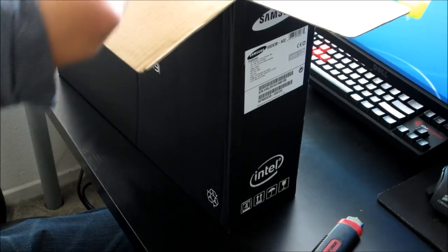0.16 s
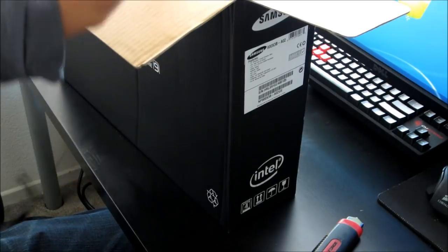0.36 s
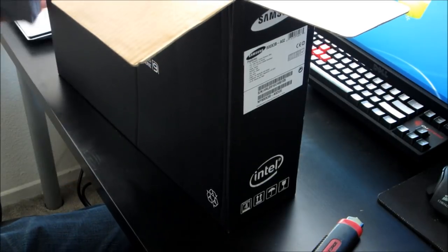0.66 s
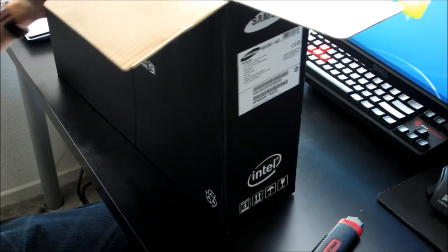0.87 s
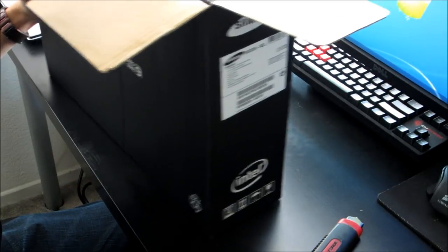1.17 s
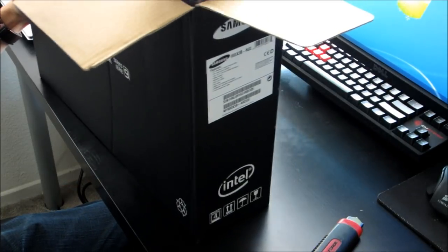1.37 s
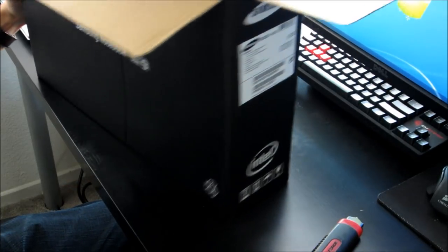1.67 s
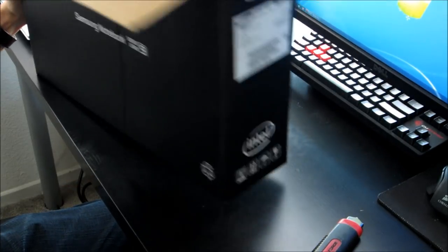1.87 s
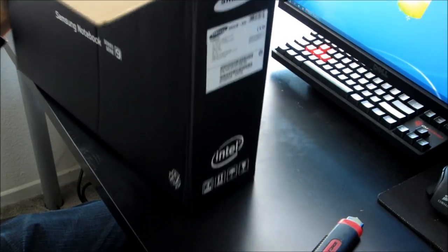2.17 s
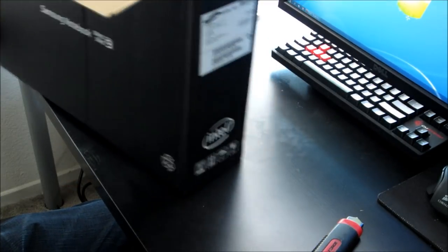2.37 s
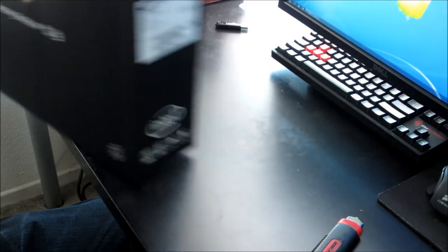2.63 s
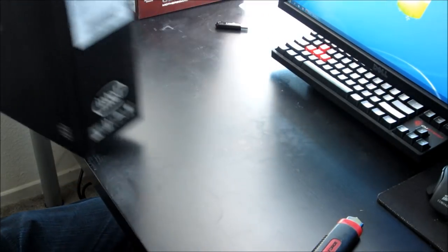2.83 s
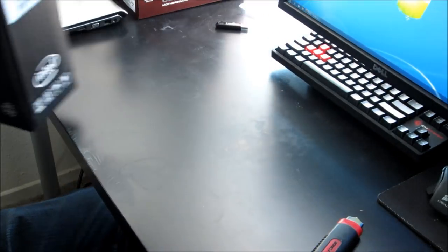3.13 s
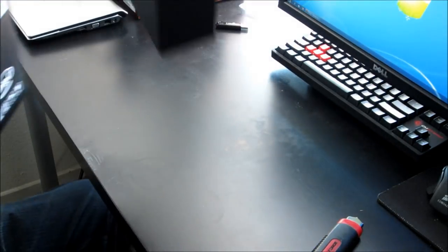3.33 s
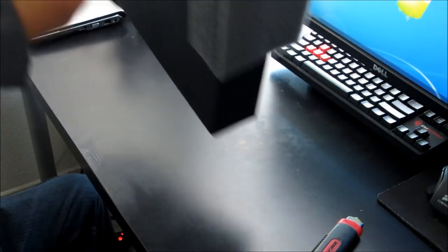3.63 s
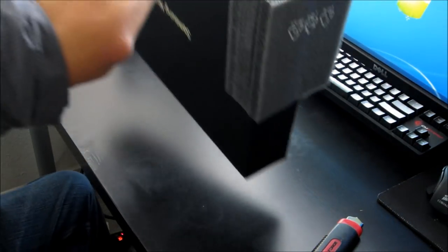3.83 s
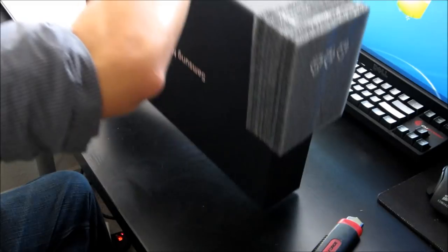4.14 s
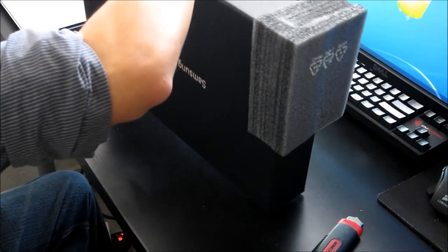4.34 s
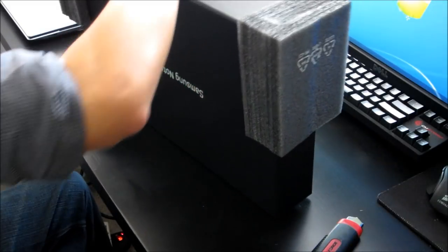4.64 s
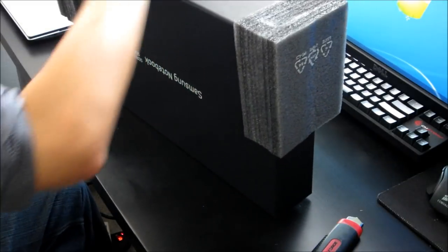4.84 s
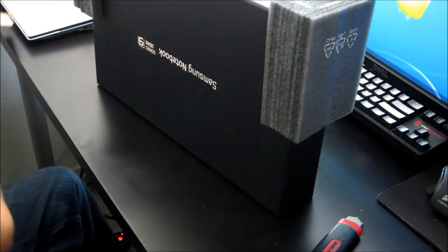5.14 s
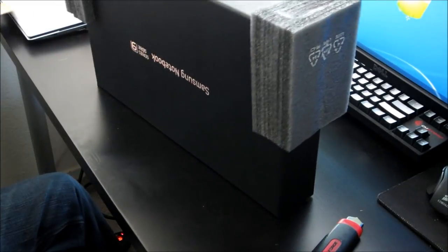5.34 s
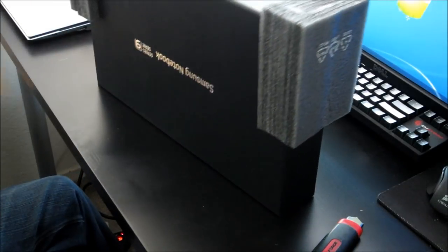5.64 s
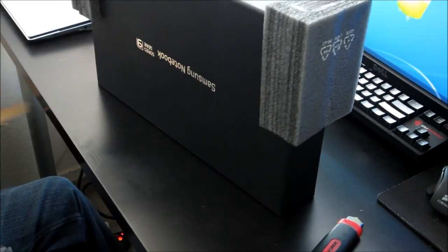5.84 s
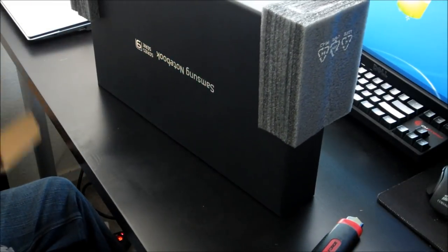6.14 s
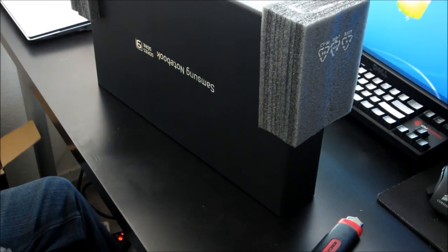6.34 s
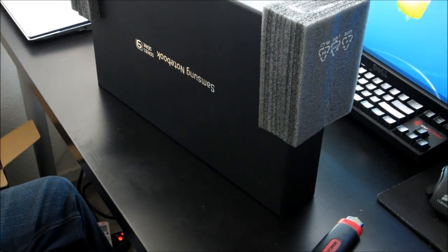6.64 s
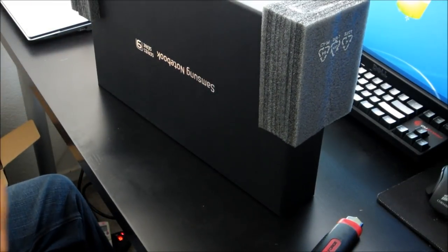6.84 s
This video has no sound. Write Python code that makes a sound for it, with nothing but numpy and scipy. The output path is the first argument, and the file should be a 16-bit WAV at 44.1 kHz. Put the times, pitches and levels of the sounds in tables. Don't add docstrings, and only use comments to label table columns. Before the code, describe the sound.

Hands fumble with a hollow cardboard box, its contents scrape out to a loud knock, then it is set down with thuds and flap rustles.

```python
import sys
import numpy as np
from scipy import signal
from scipy.fft import rfft, irfft, next_fast_len
from scipy.io import wavfile
from scipy.ndimage import uniform_filter1d

SR = 44100
rng = np.random.default_rng(int(sys.argv[2]) if len(sys.argv) > 2 else 0)


def volts_from_decibels(level):
    exponent = np.asarray(level, float) / 20
    return 10 ** exponent


def wav_record(signal):
    frames = np.transpose(np.atleast_2d(signal))
    bounded = np.clip(frames, -1, 1)
    quanta = np.round(bounded * 32767).astype(np.int16)
    wavfile.write(sys.argv[1], SR, quanta)


N = 308692

# f/Hz, level/dB, ring time factor/1
PANELS = [(100, -5, 1.37), (147, -0.5, 1.06), (188, -2, 0.61), (216.3, -1, 1.28), (265.4, -1, 0.73),
          (330, 4, 0.61), (386.6, -4, 1.33), (436.4, 1.5, 0.4), (522, 2.5, 0.52), (603.3, -21, 2),
          (630, -9, 1), (785, -11.5, 0.81), (797, -4.5, 0.61), (900, -2, 0.55), (1060, 0, 0.58),
          (1150, 10.5, 0.26), (1466, -9.5, 0.54), (1900, -13, 0.43), (2500, -40, 0.76)]
BUMP_OCTAVES, BLOW_OCTAVES = 0.64, 0.94

# start t/s, length/s, scrape level/dB, skin hiss level/dB above the scrape
STROKES = [(-.08, 0.18, -42.5, -10.5), (0.045, 0.065, -50, 0), (0.234, 0.13, -40.5, -16.5),
           (0.418, .15, -49, -7.5), (0.523, 0.25, -61, -9.5), (0.778, 0.24, -54, -3.5),
           (0.933, 0.41, -50.5, -10), (2.127, 0.11, -42, -20), (2.21, 0.35, -49, -9.5),
           (2.572, 0.19, -54.5, -6), (2.81, .17, -61.5, -23.5), (3.108, 0.099, -60.5, -23),
           (3.275, 0.14, -57, -24), (3.497, 0.071, -59.5, -18), (3.595, 0.13, -59.5, -11.5),
           (3.756, 0.13, -70, -11.5), (4.264, 0.91, -57.5, -14), (4.599, 0.26, -54, -7.5),
           (4.8, 0.73, -58.5, -10), (5.1, 0.25, -53, -18), (5.26, 0.23, -53, -8), (5.493, 0.35, -42, -19.5),
           (5.75, 0.24, -53, -11.5), (5.94, 0.16, -43, -12), (6.05, 0.22, -52, -2.5),
           (6.192, 0.21, -47.5, 0), (5.659, 0.11, -52, 0), (5.515, .035, -54, 2), (5.417, 0.089, -55.5, -8),
           (6.267, 0.13, -32.5, -31), (6.416, 0.19, -46.5, -18.5), (6.557, 0.14, -56.5, -15)]
# start t/s, length/s, level/dB
GRIPS = [(-.07, 0.086, -48), (.13, .1, -61), (.22, .16, -41), (.44, 0.073, -42.5), (.745, 0.18, -38.5),
         (.95, 0.21, -41.5), (1.12, 0.51, -46), (1.44, 0.52, -40.5), (1.83, 0.27, -40.5), (2.12, 0.2, -40),
         (2.32, 0.11, -45), (2.5, 0.39, -52), (2.63, 0.15, -45.5), (3.09, 0.25, -55.5), (3.255, 0.19, -47),
         (3.46, 0.094, -49), (3.57, 0.33, -48.5), (4.19, 0.46, -55.5), (4.55, 0.43, -52.5),
         (4.81, 0.61, -50), (5.105, 0.1, -40.5), (5.24, 0.17, -48.5), (5.44, .11, -39), (5.54, 0.15, -34),
         (5.65, .15, -40), (5.89, 0.29, -39.5), (6.2, 0.24, -35.5), (6.43, 0.22, -60)]
# t/s, drag level/dB, fibre hiss level/dB above the drag, rubbed flap f/Hz
SLIDE = [(1.139, -47, -11.5, 1060), (1.197, -32, -6, 1800), (1.25, -36, -8, 1800), (1.426, -33, -3.5, 2050),
         (1.55, -32.5, -3.5, 1800), (1.676, -31.5, -3.5, 1900), (1.75, -28.5, -5.5, 2000),
         (1.85, -31, -6.5, 1900), (1.9, -31.5, -10, 1850), (1.986, -32.5, -9.5, 1700),
         (2.06, -31, -5.5, 1550), (2.1, -35, -7.5, 1690), (2.12, -44, -6, 1700)]
# f/Hz, level/dB
SCRAPE_TONE = [(210, -33.5), (350, -8.5), (409, 7.5), (478, 6), (624, 2), (921, 6.5), (1180, 1.5),
               (1800, 2.5), (3620, -7.5), (5000, -27), (6500, -20), (11000, -120)]
# f/Hz, level/dB
FIBRE_TONE = [(900, -20), (1470, -7.5), (2300, -3.5), (2900, -4.5), (3630, -7.5), (5520, -10), (7470, -15),
              (9960, -25.5), (11100, -35), (11900, -40), (12700, -34), (13900, -32), (15200, -33),
              (16000, -34)]
# f/Hz, level/dB
SKIN_TONE = [(1470, -9), (2500, 0), (3980, -9), (4510, -6.5), (8800, -14.5), (11100, -27), (11900, -30.5),
             (14100, -20.5), (16000, -21.5)]
EARLY, POINTED = 0.74, 1
REST_CREAK_DB, REST_SCRAPE_DB, REST_HISS_DB = -77.5, -71.5, -71.5
CRACKLE_DB = -6
FLAP_HZ, FLAP_HZ_PER_DB = 1000, 1.5
FLAP_WANDER = 0.1
LOWER_FLAP, LOWER_FLAP_GAIN = 0.69, 2.8

# t/s, peak level/dB, struck panel f/Hz, ring t60/s, paper level/dB above the peak
SLAPS = [(0.079, -30, 730, 0.083, -2), (0.17, -26.5, 635, 0.067, -3), (0.226, -28, 334, 0.23, -5),
         (0.585, -39.5, 630, 0.06, -17), (0.801, -27.5, 271, 0.1, -11), (2.597, -22, 405, 0.11, -13),
         (2.723, -47.5, 312, 0.16, -4), (3.639, -40.5, 253, 0.11, -14), (4.242, -15, 324, 0.12, -18.5),
         (5.429, -27, 1010, 0.15, -8.5), (5.7, -25.5, 900, 0.046, -10.5), (5.946, -12.5, 242, 0.22, -24),
         (6.068, -29, 960, 0.069, -12.5), (6.217, -38, 1500, 0.15, -4), (6.264, -16.5, 188, 0.24, -16.5),
         (6.51, -36, 410, 0.12, -8)]
# t/s, peak level/dB, struck panel f/Hz, ring t60/s
KNOCKS = [(0.278, -25.5, 764, 0.31), (0.445, -40.5, 172, 0.2), (0.638, -39.5, 320, 0.05),
          (0.925, -35, 227, 0.48), (2.126, -6.5, 300, 0.1), (3.131, -45.5, 477, 0.19),
          (3.561, -33, 242, 0.14), (3.677, -36, 292, 0.067), (4.2, -44, 535, 0.47),
          (4.594, -8.5, 148, 0.062), (4.601, -6.5, 314, 0.12), (4.669, -20, 150, 0.18),
          (5.107, -25, 282, 0.079), (5.484, -25, 300, 0.18), (5.527, -35, 315, 0.15),
          (5.61, -26, 304, 0.074), (5.829, -30.5, 310, 0.13), (5.9, -33, 342, 0.058),
          (6.291, -10.5, 470, 0.16), (6.309, -10.5, 580, 0.06), (6.334, -14.5, 500, 0.11)]
# t/s, peak level/dB, struck panel f/Hz, ring t60/s
BUMPS = [(0.324, -23.5, 685, 0.12), (0.677, -35.5, 312, 0.055), (0.753, -30, 190, 0.3),
         (2.136, -6, 215, 0.14), (2.172, -16.5, 227, 0.18), (2.382, -29, 234, 0.49), (2.44, -30, 240, 0.14),
         (3.259, -30.5, 293, 0.17), (3.325, -23, 200, 0.2), (3.458, -33, 242, 0.15),
         (3.783, -38, 248, 0.052), (3.868, -42.5, 306, 0.08), (5.019, -39, 400, 0.18),
         (5.339, -35.5, 440, 0.15), (5.578, -20.5, 203, 0.21), (5.874, -29.5, 390, 0.061),
         (6.35, -17.5, 199, 0.16), (6.383, -18.5, 317, 0.13)]
# f/Hz, level/dB
PAPER_TONE = [(410, -17), (700, 0.5), (1090, -4), (1280, -6), (1380, -10), (1640, -11), (3500, -24),
              (3990, -26.5), (6650, -29), (9230, -40.5), (11800, -54), (13100, -51.5), (16000, -43)]
KNOCK_PAPER_DB, BUMP_PAPER_DB = -20.5, -33
SLAP_TOUCH_S, KNOCK_TOUCH_S, BUMP_TOUCH_S = 0.0053, 0.0025, 0.0057

# t/s, peak level/dB, f/Hz
SNAPS = [(0.0808, -17.5, 2370), (0.1676, -26.5, 5600), (0.195, -18, 3430), (0.2259, -39, 3200),
         (0.67, -47, 5800), (0.7986, -62, 3200), (2.128, -21.5, 3770), (2.669, -43, 3280),
         (3.5017, -47, 5900), (3.6477, -45, 3500), (4.505, -48, 5000), (4.596, -31, 3820),
         (5.628, -48, 8000), (5.1093, -60, 3490), (5.4291, -44, 3600), (5.5218, -35.5, 7040),
         (5.7004, -45, 4030)]
# t/s, level/dB, f/Hz, length/s, width/Hz
SQUEAKS = [
    (1.63, -35, 462, 0.068, 47),
    (2.03, -37, 390, 0.055, 80),
    (2.035, -40, 890, 0.055, 150),
    (2.637, -45, 930, 0.03, 90),
    (5.421, -36, 1040, 0.043, 90),
    (5.472, -51.5, 1900, 0.093, 120),
    (6.068, -42, 1000, 0.07, 93),
    (6.214, -41.5, 1760, 0.037, 300),
    (6.462, -47, 1950, .08, 450),
    (0.082, -43, 1980, 0.047, 600),
]
# t/s, level/dB, f/Hz, length/s, width/Hz
MORE_SQUEAKS = [(1, -36, 184, 0.051, 41), (1.62, -39, 226, .08, 70), (2.1, -33, 900, 0.0485, 120),
                (3.27, -36.5, 190, 0.07, 45), (3.34, -48, 264, .06, 50), (3.59, -48, 264, 0.07, 50),
                (5.485, -37.5, 317, 0.054, 73), (5.63, -52, 1820, .05, 150), (5.575, -36.5, 730, 0.05, 140),
                (5.705, -46, 1480, .035, 150), (5.955, -43, 1140, .07, 300), (1.71, -40, 1170, 0.055, 200),
                (.09, -46.5, 1600, .05, 560), (.96, -48, 247, 0.13, 120), (4.63, -33, 322, 0.11, 62)]
# t/s, peak level/dB,
# f/Hz, t60/s
PINGS = [(0.226, -32, 900, 0.041), (0.441, -35, 900, 0.027), (0.278, -28, 1505, 0.045),
         (2.1346, 0, 330, .05), (2.195, -28, 300, 0.11), (2.22, -30, 330, 0.11), (2.149, -32, 2200, 0.034),
         (2.158, -22, 304, 0.063), (3.259, -33.5, 390, 0.13), (3.322, -35.5, 572, 0.081),
         (3.325, -43, 1000, 0.059), (3.458, -43, 520, .07), (3.56, -42, 533, 0.072),
         (3.674, -42, 340, 0.071), (3.784, -39, 240, 0.095), (4.241, -28, 602, 0.046),
         (4.6, -14.5, 325.3, 0.22), (.801, -29, 420, .05), (.2, -32, 250, .08), (.34, -30, 130, .12),
         (4.605, -28, 1020, .09), (4.672, -22, 280, .1), (4.3, -30, 330, .1), (5.13, -34, 340, .1),
         (5.11, -36, 620, .08), (2.365, -36, 240, .1), (2.47, -36, 250, .07), (2.172, -26, 850, .05),
         (5.605, -38, 1500, .03), (5.67, -40, 2100, .03), (5.99, -36, 1500, .04),
         (5.02, -40, 800, .03), (5.326, -44, 1075, .04), (5.438, -32, 1110, .05),
            (5.528, -38.5, 1960, .05), (5.556, -35, 1080, .08), (5.583, -18, 280, 0.055),
            (5.622, -24, 271, .06), (5.639, -25, 260, 0.065), (5.594, -34, 765, .06),
            (5.704, -25, 950, .03), (5.632, -38, 2150, .05), (5.64, -40, 1380, .06),
            (5.701, -34, 1800, 0.046), (5.873, -34, 800, .03), (5.942, -20, 406, 0.075),
            (6.069, -27, 1000, 0.1), (6.217, -37, 1600, 0.044), (6.293, -13, 416, .07),
            (6.305, -20, 1184, 0.095), (6.322, -17, 519, 0.1), (6.345, -19, 485, 0.057),
            (6.428, -37, 1176, .05), (6.242, -28, 200, .08), (6.31, -30, 1900, .05),
            (6.312, -35, 2600, .04), (6.365, -29, 1160, .04), (6.515, -38, 900, .05),
            (6.49, -38, 396, 0.11), (5.969, -23, 287, .06), (3.135, -49, 900, .04), (3.335, -45, 1200, .05),
            (4.93, -44, 350, .07), (5.2, -44, 300, .07), (2.599, -23, 415, .07), (4.246, -20, 300, .09),
            (0.085, -35, 2200, .05)]
PING_RISE_CYCLES = 0.95
# t/s, peak level/dB, f/Hz, t60/s
THUMPS = [(0.329, -31.5, 94, 0.14), (2.13, -38, 90, 0.63), (2.601, -36.5, 75, 0.2), (3.299, -59, 92, 0.41),
          (4.251, -38.5, 52.6, 0.35), (4.297, -45, 44.5, 0.2), (4.602, -19, 72.3, 0.25),
          (4.629, -44, 80.2, 0.8), (5.55, -35, 105.3, 0.38), (4.589, -14, 139, 0.24),
          (6.268, -12.5, 86.4, 0.076)]

# f/Hz, level/dB
AIR_TONE = [(12, -46), (20, -1.5), (216, 2), (301, 0), (446, -4.5), (558, -2.5), (738, -7.5), (1090, -9),
            (2390, -18.5), (3740, -28), (7730, -29), (10500, -43.5), (11800, -49.5), (13900, -46),
            (16000, -36.5)]
AIR_DB = -49.5
# f/Hz, t60/s
ROOM = [(100, 0.27), (400, 0.27), (1500, 0.2), (6000, 0.19)]
ROOM_DB = -8
# f/Hz, left minus right level/dB
LEAN_RUB = [(60, -2), (180, -16), (550, -2.5), (1650, 0), (4970, 4.5), (15000, 8)]
# f/Hz, left minus right level/dB
LEAN_KNOCK = [(60, -6), (180, -4.5), (550, -2), (1650, -0.5), (4970, 4.5), (15000, 6)]
# f/Hz, likeness/1
SAME = [(150, 0.88), (500, 0.91), (1500, 0.63), (5000, 0.85), (14000, 0.05)]
# f/Hz, level/dB
MIC = [(10, -36), (45, -1), (80, -3), (10900, 2), (11700, -8), (12200, -35), (12700, -2)]
# f/Hz, level/dB
EDGE = [(15600, 0), (15800, -90)]


def evened(x):
    return x / np.sqrt(np.mean(x ** 2) + 1e-20)


def read(points, hz):
    f, value = np.transpose(points)
    return np.interp(np.log(hz + 1), np.log(f + 1), value)


def colour(x, points):
    size = next_fast_len(x.shape[-1] + 2048)
    gain = volts_from_decibels(read(points, np.fft.rfftfreq(size, 1 / SR)))
    return irfft(rfft(x, size) * gain, size)[..., :x.shape[-1]]


def add(mix, s, sound):
    part = mix[round(s * SR):][:len(sound)]
    part += sound[:len(part)]


def resonate(x, hz, width_hz):
    turn = np.exp(2j * np.pi * np.cumsum(hz) / SR)
    r = np.exp(-np.pi * width_hz / SR)
    return 2 * (turn * signal.lfilter([1 - r], [1, -r], x / turn)).real


def touches(rows, rest_db):
    power, t = np.full(N, volts_from_decibels(rest_db) ** 2), np.arange(N) / SR
    for s, length, db in rows:
        progress = np.clip((t - s) / length, 0, 1)
        press = abs(np.sin(np.pi * progress ** EARLY)) ** POINTED
        power += (volts_from_decibels(db) * press) ** 2
    return np.sqrt(power)


def grit(per_s, spread_db, lumps_db, lump_size):
    happens = rng.random(N) < per_s / SR
    size = volts_from_decibels(spread_db * np.minimum(rng.exponential(1, N), 4)) * happens
    lumps = uniform_filter1d(uniform_filter1d(rng.standard_normal(N), lump_size), lump_size)
    return evened(size * rng.standard_normal(N) * volts_from_decibels(lumps_db * evened(lumps)))


def panels(t, centre_hz, t60, phase, octaves, detune=1):
    hz, db, slow = np.transpose(PANELS)[..., None]
    hz = hz * detune
    slow = slow * (hz / centre_hz) ** -.3
    near_db = -6 * (np.log2(hz / centre_hz) / octaves) ** 2
    fade = volts_from_decibels(db + near_db - 60 * t / (t60 * slow))
    start = 1 - np.exp(-t * hz * 10.0)
    ring = (fade * start * np.sin(2 * np.pi * (hz * t + phase[:, None]))).sum(0)
    return signal.sosfilt(signal.butter(2, [70, 3500], "band", fs=SR, output="sos"), ring)


def rubbing():
    now, (s, *columns) = np.arange(N) / SR, np.transpose(SLIDE)
    sliding = (now > s[0]) & (now < s[-1])
    drag_db, fibre_db, slide_hz = (np.interp(now, s, c) for c in columns)
    skin = touches([(s, length, db + rel_db) for s, length, db, rel_db in STROKES], REST_HISS_DB)
    scrape = np.hypot(touches([row[:3] for row in STROKES], REST_SCRAPE_DB), sliding * volts_from_decibels(drag_db))
    hand_hz = FLAP_HZ + FLAP_HZ_PER_DB * (20 * np.log10(skin) - REST_HISS_DB)
    flap_hz = np.where(sliding, slide_hz, hand_hz)

    t = np.arange(SR // 4) / SR
    phase = rng.random(len(PANELS))
    low = panels(t, 331, 0.06, phase, octaves=1.0)
    slow_slips = grit(600, 2.0, 2.1, lump_size=500) * touches(GRIPS, REST_CREAK_DB)
    creak = signal.oaconvolve(slow_slips, low / np.linalg.norm(low))[:N]

    high = panels(t, 900, 0.034, phase, octaves=0.94)
    slips = grit(6000, 1.8, 1.5, lump_size=300)
    surface = evened(colour(slips, SCRAPE_TONE))
    wander = evened(uniform_filter1d(uniform_filter1d(slips, size=1500), size=1500))
    flap_hz = flap_hz * (1 + FLAP_WANDER * wander)
    body = 0.73 * evened(signal.oaconvolve(slips, high)[:N]) + surface
    body = body + 2.9 * evened(resonate(surface, flap_hz, 650))
    body = body + LOWER_FLAP_GAIN * evened(resonate(surface, LOWER_FLAP * flap_hz, 550))

    crackle = evened(colour(grit(700, 1.5, 2.5, lump_size=900), SCRAPE_TONE))
    fibres = grit(9000, 1.3, 1.0, lump_size=300)
    hiss = sliding * volts_from_decibels(drag_db + fibre_db) * evened(colour(fibres, FIBRE_TONE))
    hiss = hiss + skin * evened(colour(fibres, SKIN_TONE))
    return creak, evened(body) * scrape + hiss + volts_from_decibels(CRACKLE_DB) * scrape * crackle


def air():
    a, b = rng.standard_normal((2, N))
    return volts_from_decibels(AIR_DB) * evened(colour(np.array([a + 1.67 * b, a - 2.0 * b]), AIR_TONE))


def blows():
    out, t = np.zeros(N), np.arange(SR // 3) / SR
    rows = [(*row, SLAP_TOUCH_S) for row in SLAPS]
    rows += [(*row, KNOCK_PAPER_DB, KNOCK_TOUCH_S) for row in KNOCKS]
    rows += [(*row, BUMP_PAPER_DB, BUMP_TOUCH_S) for row in BUMPS]
    rows.sort()
    phases, flex = rng.random((2, len(rows), len(PANELS)))
    noise = rng.standard_normal((len(rows), 2, len(t)))
    for (s, db, hz, t60, slap_db, touch), phase, bend, (rattle, paper) in zip(rows, phases, flex, noise):
        t60, u = max(t60, .02), t / max(touch, 3e-4)
        octaves = BUMP_OCTAVES if touch == BUMP_TOUCH_S else BLOW_OCTAVES
        detune = 1 + 0.048 * (bend[:, None] - .5)
        free = panels(t, hz, t60, phase, octaves, detune)
        shaken = signal.fftconvolve(free, (rattle * np.exp(-u / 1.7))[:3000])[:len(t)]
        crack = panels(t, 590, 0.067, bend, octaves=0.5)
        ring = 0.18 * evened(crack) + evened(free * (1 - np.exp(-u * 2.2))) + 0.39 * evened(shaken)
        slap = evened(colour(paper, PAPER_TONE)) * volts_from_decibels(-60 * t / (2.45 * t60))
        slap = slap * (1 - np.exp(-t / 0.00083))
        add(out, s - .001, volts_from_decibels(db) * (ring / abs(ring).max() + volts_from_decibels(slap_db) * slap))
    return out


def snaps():
    out, t = np.zeros(N), np.arange(600) / SR
    for s, db, hz in SNAPS:
        start = 1 - np.exp(-t * hz * 4.9)
        add(out, s, volts_from_decibels(db - 60 * t / 0.0032) * np.sin(2 * np.pi * hz * t) * start)
    return out


def squeaks(rows):
    out, noise = np.zeros(N), rng.standard_normal((len(rows), SR // 5))
    for (s, db, hz, length, width_hz), rub in zip(rows, noise):
        pitch = np.full(len(rub), hz)
        tone = evened(resonate(resonate(rub, pitch, width_hz), pitch, width_hz))
        shape = signal.windows.tukey(round(length * SR), .6)
        add(out, s, volts_from_decibels(db) * tone[-len(shape):] * shape)
    return out


def pings():
    out, t = np.zeros(N), np.arange(SR // 4) / SR
    for s, db, hz, t60 in PINGS:
        start = 1 - np.exp(-t * hz / PING_RISE_CYCLES)
        add(out, s, volts_from_decibels(db - 60 * t / t60) * np.sin(2 * np.pi * hz * t) * start)
    return out


def thumps():
    out, t = np.zeros(N), np.arange(SR // 2) / SR
    noise = rng.standard_normal((len(THUMPS), len(t)))
    for (s, db, hz, t60), shake in zip(THUMPS, noise):
        pitch = np.full(len(t), hz)
        wobble = evened(resonate(resonate(shake, pitch, 32), pitch, 32))
        swing = np.sin(2 * np.pi * hz * t) + 1.63 * wobble
        add(out, s, volts_from_decibels(db - 60 * t / t60) * swing * (1 - np.exp(-t / 0.04)))
    return out


def room(x):
    taps = np.zeros((2, SR // 2))
    slots = np.arange(200, SR // 2 - 40, 20)
    at = slots + rng.integers(0, 20, (2, len(slots)))
    np.put_along_axis(taps, at, rng.choice([-1., 1.], at.shape), 1)
    taps[1] += uniform_filter1d(taps[0] - taps[1], size=15)
    hz, t, z = signal.stft(taps, SR, nperseg=256)
    tail = signal.istft(z * volts_from_decibels(-60 * t / read(ROOM, hz)[:, None]), SR, nperseg=256)[1]
    return signal.fftconvolve(x[None], tail / np.linalg.norm(tail[0]), axes=1)[:, :N]


def ports(x, lean):
    t = np.arange(4096) / SR
    smear = rng.standard_normal(4096) * volts_from_decibels(-60 * t / .08)
    other = signal.oaconvolve(x, smear / np.linalg.norm(smear))[:N]
    size = next_fast_len(N + 2048)
    hz = np.fft.rfftfreq(size, 1 / SR)
    apart = np.sqrt(np.clip(1 - read(SAME, hz), 0, 1) / 2)
    shared, differing = rfft(x, size), rfft(other, size) * apart
    half = volts_from_decibels(read(lean, hz) / 2)
    return irfft(np.array([(shared + differing) * half, (shared - differing) / half]), size)[:, :N]


def scene():
    creak, scrape = rubbing()
    box = creak + blows() + snaps() + squeaks(SQUEAKS) + pings() + thumps()
    echo = volts_from_decibels(ROOM_DB) * room(box + scrape) * volts_from_decibels([[-1.5], [1.5]])
    direct = ports(box, LEAN_KNOCK) + ports(scrape, LEAN_RUB)
    return direct + echo + air() + ports(squeaks(MORE_SQUEAKS), LEAN_KNOCK)


def top_cut(x):
    return signal.sosfilt(signal.butter(12, 16400, fs=SR, output="sos"), x)


def record(dry):
    low = uniform_filter1d(dry[1], size=4)
    right = dry[1] - low + np.roll(low, 1)
    heard = colour(np.array([dry[0], right]), MIC)
    return top_cut(colour(np.clip(heard, -1, 1), EDGE))


dry = scene()
out = record(dry)
wav_record(out)
```